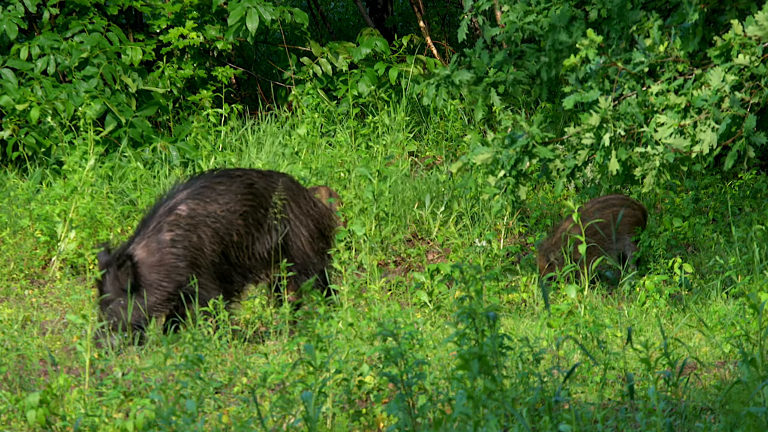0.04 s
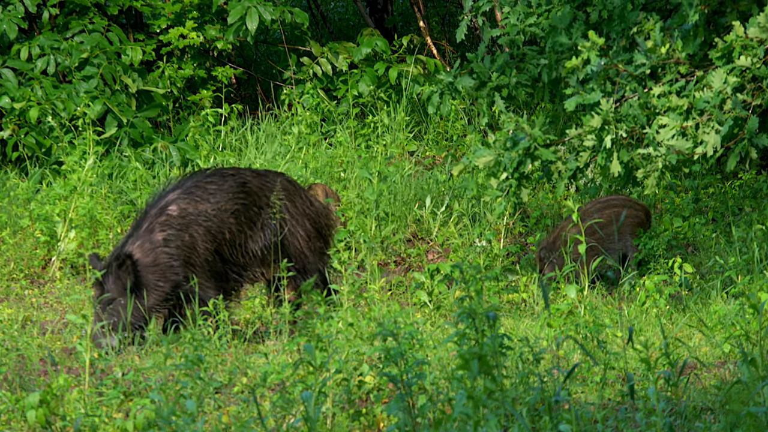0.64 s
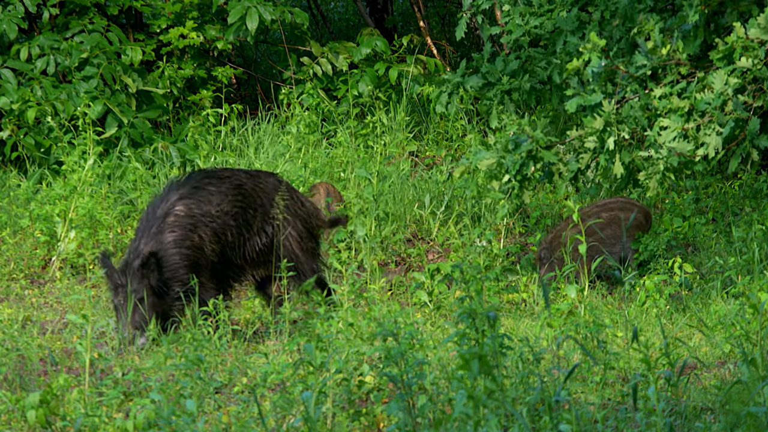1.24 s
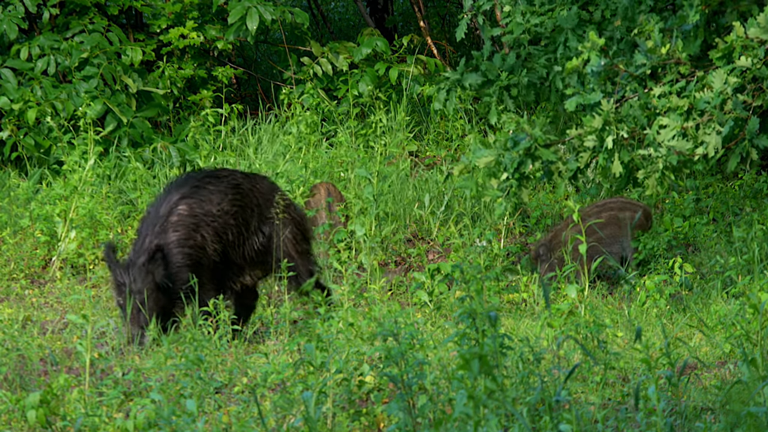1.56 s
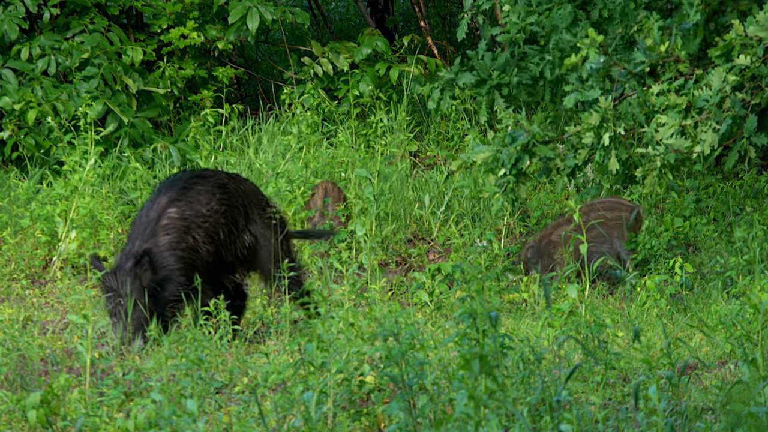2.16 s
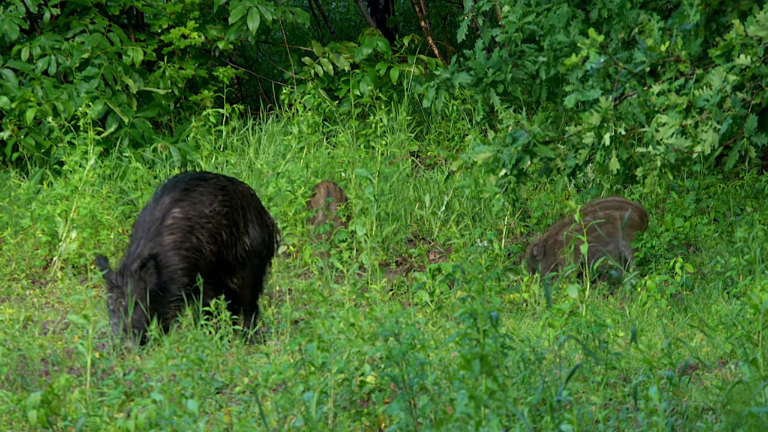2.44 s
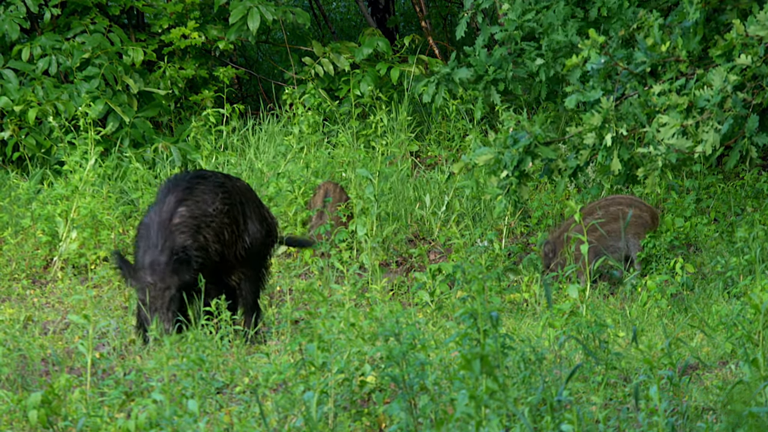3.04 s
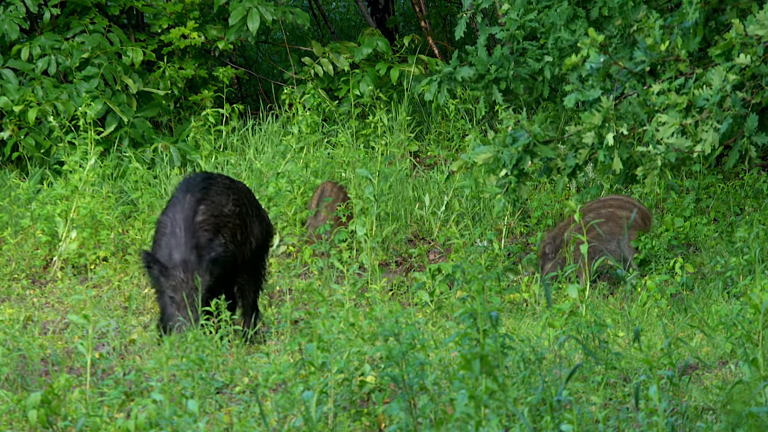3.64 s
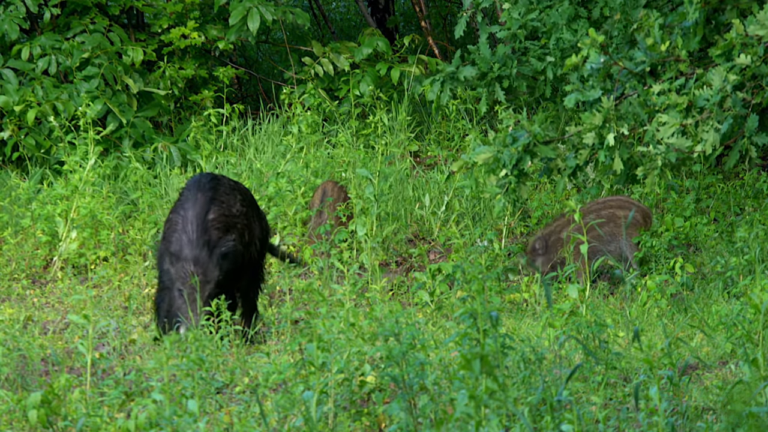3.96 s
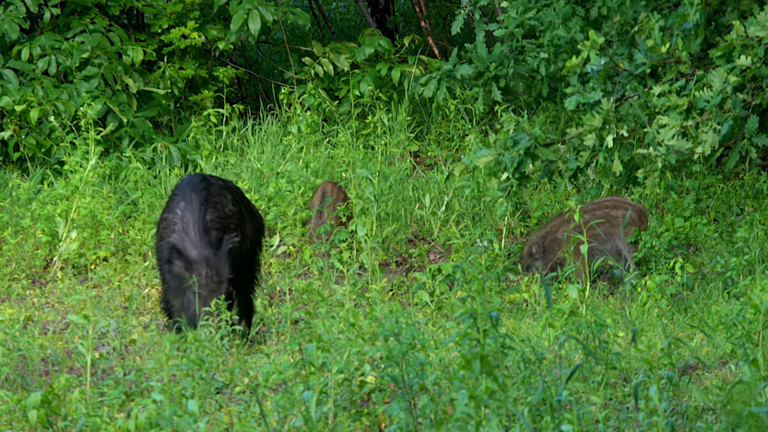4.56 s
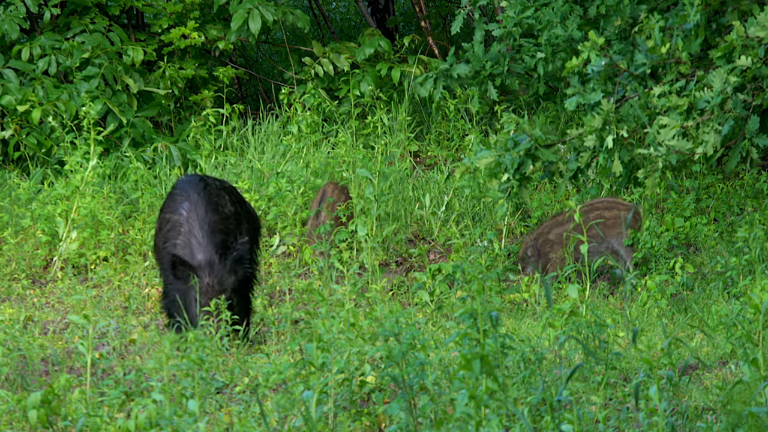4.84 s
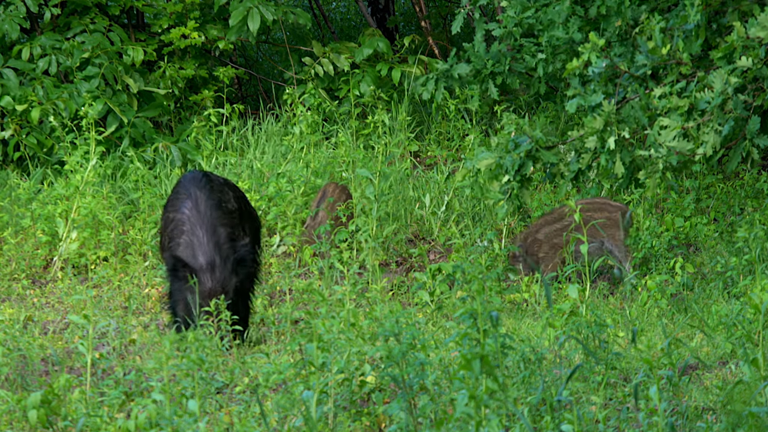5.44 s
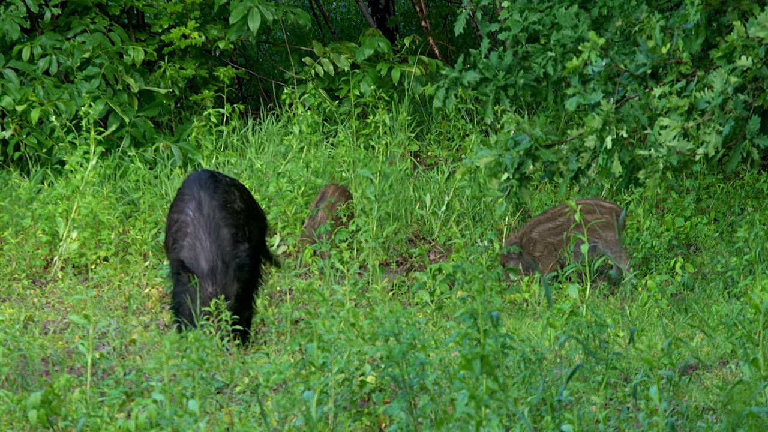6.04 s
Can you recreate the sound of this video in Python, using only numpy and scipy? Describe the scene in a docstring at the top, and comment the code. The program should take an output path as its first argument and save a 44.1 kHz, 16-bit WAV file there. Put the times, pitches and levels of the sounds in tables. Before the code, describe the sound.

Short upward bird whistles recur over distant chirps, soft woodland hiss and occasional crackles of wild boar feeding in plants.

```python
"""A short rising whistle rings through a forest clearing, repeated by one bird and scattered by trees.
A second bird slurs a soft phrase on the left, others call far off, and there is one faint low hoot;
each voice is a nearly pure tone modulated in pitch and level. Grazing wild boar snap stems and brush
plants in bursts of crackling noise, over the steady hush of the wood and its leaves."""
import sys
import numpy as np
from scipy import signal
from scipy.fft import rfft, irfft, next_fast_len
from scipy.io import wavfile
from scipy.ndimage import map_coordinates

SR = 44100
rng = np.random.default_rng(int(sys.argv[2]) if len(sys.argv) > 2 else 0)


def materialize(psi):
    """Save the field psi as 16-bit PCM at rate SR to the path in sys.argv[1].

    A 1-D psi becomes a single channel; in a 2-D psi each row is a channel.
    """
    bounded = np.clip(np.atleast_2d(psi).T, -1, 1)
    quanta = np.round(bounded * 32767).astype(np.int16)
    wavfile.write(sys.argv[1], SR, quanta)


N = 277389

# The main bird's whistles. Each row: loudest moment in seconds, level in dB, time stretch as a ratio.
WHISTLE_CALLS = [(.016, -31.7, 1.05), (1.023, -31, 0.91), (1.945, -32.7, 1.07), (3.057, -31.7, 1.01),
                 (4.267, -32.6, .92), (5.457, -31.2, .87)]
# The whistle's early paths: direct, off the ground and off two trunks.
# Each row: delay in ms, gain in dB, left minus right level in dB, lag of the left channel in ms.
EARLY_PATHS = [(0, 0, -3, .083), (.835, -13, 1, -.04), (2.085, -13, .7, .33), (4.45, -16, -2.5, -.23)]
# The second bird's notes. Each row: start in seconds, length in seconds, centre pitch in Hz,
# opening slide offset in Hz, glide in Hz, closing flick in Hz, level at the centre pitch in dB.
SONG_NOTES = [(0.059, .07, 3250, 600, -600, 0, -56), (0.22, .074, 2930, -2, 333, 1050, -56),
              (.349, .098, 2860, 0, 400, 750, -57), (.512, .168, 3160, 1550, 480, 400, -53.7),
              (.821, 0.05, 3600, -1300, -950, -400, -52), (5.271, 0.018, 4400, 3, 700, 0, -61.5)]
# Far birds. Each row: start in seconds, length in seconds, centre pitch in Hz, glide in Hz, level in dB.
DISTANT_NOTES = [(.06, .16, 2300, -60, -57.5), (.733, .08, 2710, -470, -57), (.785, 0.11, 4290, 90, -54),
                 (1.461, .073, 3220, 183, -54), (1.534, .11, 3860, -100, -55), (1.569, .1, 3000, -950, -54),
                 (2.24, .11, 3360, -2, -58.5), (2.52, .25, 3840, 2, -61.5), (3.192, .076, 3870, -110, -57),
                 (3.223, .1, 2800, -700, -56.5), (3.247, .2, 3380, 200, -60.5),
                 (4.816, .12, 2400, -60, -53), (4.9, .18, 2290, -50, -55.3), (5.235, 0.051, 2540, 40, -53),
                 (5.578, .16, 2130, -37.5, -60.5)]
# Breaking stems. Each row: start in seconds, level in dB, band centre in Hz, 60 dB decay in seconds.
STEM_SNAPS = [(0.1755, -38, 1980, 0.018), (.958, -35.5, 15000, .022), (1.405, -47.5, 3500, 0.027),
              (1.45, -43, 13000, .038), (1.537, -50.5, 13000, .03), (1.615, -52.5, 14000, .035),
              (3.118, -45, 9000, .038), (3.299, -42.5, 12000, .025), (5.377, -55, 12000, .04),
              (5.431, -50.5, 12000, 0.046), (5.567, -44, 11000, .033)]
# Brushed and torn plants. Each row: start in seconds, length in seconds, level in dB, band centre in Hz.
PLANT_RUSTLES = [(0, 0.3, -57.5, 2560), (0, 0.33, -60, 9000), (0.174, 0.039, -47, 2000),
                 (0.944, .13, -59, 8000), (1.41, 0.044, -51.5, 2500), (2.937, 0.033, -56, 1500),
                 (3.449, 0.073, -53.5, 6440), (3.829, 0.059, -52.5, 1700), (4.336, 0.044, -51, 3500),
                 (5.519, 0.23, -56, 2500)]
# The spectrum of the hush. Each row: frequency in Hz, relative spectral density in dB.
HUSH_SPECTRUM = [(15, -55), (25, -30), (37, -17.5), (107, -14.5), (246, -14), (289, -9.5), (410, -8.5),
                 (482, -6.5), (703, -3.5), (782, -1.5), (1490, -2), (1750, -1.5), (3090, -5.5),
                 (3830, -9.5), (15500, -23)]
# The width of the hush. Each row: frequency in Hz, left-right correlation (1 is mono).
HUSH_COHERENCE = [(60, 1.0), (130, 1), (290, 0.89), (640, 0.6), (1410, 0.52), (3100, 0.15), (6820, 0.15),
                  (15000, 0.12)]


def whistler(foliage_db=-3.7, deep_db=-14, absorb_from_hz=3500, absorb_db_per_hz=.0035):
    """Multipath interference: early echoes add and cancel as the pitch climbs, then the wood rings on."""
    out = np.zeros((2, N))
    lead_s = .15  # from onset to loudest moment, before stretching
    for loudest_s, level_db, stretch in WHISTLE_CALLS:
        call = upsweep(lead_s, stretch, level_db)
        start = loudest_s - lead_s * stretch
        for delay_ms, path_db, pan_db, lag_ms in EARLY_PATHS:
            add(out, start, amp(path_db) * placed(call, pan_db, lag_ms, delay_ms))
        # leaves absorb the top of the sweep
        dulled = filtered(call, lambda hz: amp(-absorb_db_per_hz * np.maximum(hz - absorb_from_hz, 0)))
        foliage = amp(foliage_db) * placed(scatter(dulled, t60=.22, onset_s=.005), pan_db=-1.5, lag_ms=0)
        deep_wood = amp(deep_db) * scatter(dulled, t60=.58, onset_s=.045)
        add(out, start, foliage + deep_wood)
    return out


def upsweep(lead_s, stretch, level_db):
    """Frequency modulation: a swelling whistle creeps upward, then leaps just before it is loudest."""
    # times and rates hold for a stretch of 1
    start_hz, creep_hz_per_s = 2725, 5500
    leap_hz, leap_lead_s, leap_s = 640, .0208, .0108
    swell_db_per_s, hold_s, release_db_per_s = 180, .0035, 1800
    soft_onset_db, onset_s, flutter_hz = 8, .032, 35.9
    t = np.arange(-lead_s, 4 * hold_s, 1 / (SR * stretch))  # zero at the loudest moment
    leap = leap_hz / (1 + np.exp(-(t + leap_lead_s) / leap_s))
    hz = start_hz + creep_hz_per_s * (t + lead_s) + leap
    attack_db = swell_db_per_s * np.minimum(t, 0) - soft_onset_db * np.exp(-(t + lead_s) / onset_s)
    release_db = -release_db_per_s * np.maximum(t - hold_s, 0)
    flutter_db = (.3 - 30 * t) * np.cos(2 * np.pi * flutter_hz * t)  # steadies as the whistle swells
    return tone(hz, level_db + attack_db + release_db + flutter_db, waver=.0056)


def singer(slide_s=.02, flick_share=.146, effort_db_per_hz=.0055, wet_db=-7):
    """Coupled pitch and amplitude: the bird on the left grows louder as it bends a note upward."""
    song = np.zeros(N)
    for start, length, centre_hz, slide_hz, glide_hz, flick_hz, db in SONG_NOTES:
        t = np.arange(0, length, 1 / SR)
        progress = t / length
        slide = slide_hz * np.exp(-t / slide_s)
        flick = flick_hz * np.exp((progress - 1) / flick_share)
        bend_hz = slide + glide_hz * (progress - .5) + flick
        add(song, start, tone(centre_hz + bend_hz, db + effort_db_per_hz * bend_hz, waver=.0045, edges=.2))
    return placed(song, pan_db=6, lag_ms=-.06) + amp(wet_db) * scatter(song, t60=.34, onset_s=.0069)


def grazing(fibre_db=4.5, grain_db=5.5, attack_s=.001):
    """Fracture and friction: boar snap stems in decaying bursts and brush plants in grainy swells."""
    out = np.zeros((2, N))
    t = np.arange(SR // 10) / SR
    for start, db, hz, t60 in STEM_SNAPS:
        fibres = amp(fibre_db * wobble(700, len(t)))
        envelope = amp(db - 60 * t / t60) * (1 - np.exp(-t / attack_s))
        add(out, start, envelope * fibres * noise_band(len(t), hz, octaves=.83))
    for start, length, db, hz in PLANT_RUSTLES:
        size = int(length * SR)
        grains = amp(grain_db * wobble(500, SR)[:size])
        add(out, start, amp(db) * np.hanning(size) * unit(grains * noise_band(size, hz, octaves=.89)))
    return out


def far_birds(edge_db=-7):
    """A diffuse field: distant notes swell and fade, arriving only as sound scattered by the trees."""
    song = np.zeros(N)
    for start, length, hz, glide_hz, db in DISTANT_NOTES:
        from_middle = np.linspace(-.5, .5, int(length * SR))
        swell_db = edge_db * 2 * abs(from_middle)
        add(song, start, tone(hz + glide_hz * from_middle, db + swell_db, waver=.013))
    return scatter(song, t60=.35, onset_s=.0013)


def hoot(start_s=.59, hz=194, rise_hz_per_s=28, level_db=-73, fade_db=14):
    """An amplitude envelope: one far, low tone swells, holds and dies away while rising slightly."""
    out = np.zeros(N)
    stages = np.cumsum([0, .045, .12, .2])  # attack, hold and release in seconds
    t = np.arange(0, stages[-1], 1 / SR)
    db = level_db - fade_db * np.interp(t, stages, [1, 0, 0, 1])
    add(out, start_s, tone(hz + rise_hz_per_s * t, db, waver=.0015))
    return out


def hush(wood_db=-56.5, leaf_db=-57, split_hz=3500, stir_db=3, stir_s=.42):
    """Partial coherence: the wood's murmur is near mono in the bass, under a wide hiss of leaves."""
    def mid_side_gains(hz):
        angle = np.arccos(np.clip(along(HUSH_COHERENCE, hz), -1, 1)) / 2
        return amp(along(HUSH_SPECTRUM, hz)) * [np.cos(angle), np.sin(angle)]

    t = np.arange(N) / SR
    mid, side = filtered(rng.standard_normal((2, N)), mid_side_gains)
    air = np.array([mid + side, mid - side])
    low = filtered(air, lambda hz: 1 / (1 + (hz / split_hz) ** 4))
    wood = amp(wood_db) * unit(low)
    leaves = amp(leaf_db + stir_db * np.exp(-t / stir_s)) * unit(air - low)  # louder at first
    return wood + leaves


def scatter(x, t60, onset_s):
    """Reverberation: echoes from leaves and trunks merge into a different tail in each channel."""
    t = np.arange(SR) / SR
    tail = rng.standard_normal((2, SR)) * amp(-60 * t / t60) * (1 - np.exp(-t / onset_s))
    return signal.fftconvolve(x[None], unit(tail) / np.sqrt(SR), axes=1)[:, :N]


def placed(x, pan_db, lag_ms, delay_ms=0):
    """Level and time differences give direction: the left channel is pan_db louder and lag_ms later."""
    side = np.array([[.5], [-.5]])
    arrival_s = (delay_ms + side * lag_ms) / 1000
    return amp(side * pan_db) * filtered(x, lambda hz: np.exp(-2j * np.pi * hz * arrival_s))


def tone(hz, db, waver, edges=.058):
    """A sine whose phase integrates a wavering pitch; edges is the share spent fading in and out."""
    pitch = hz * (1 + waver * wobble(150, SR)[:len(hz)])
    fade = signal.windows.tukey(len(hz), edges)
    return np.sqrt(2) * fade * amp(db) * np.sin(2 * np.pi * np.cumsum(pitch) / SR)


def noise_band(size, centre_hz, octaves):
    """Band-pass filtering: stereo noise falls to half amplitude this many octaves from its centre."""
    white = rng.standard_normal((2, SR))[:, :size]
    return unit(filtered(white, lambda hz: 1 / (1 + (np.log2((hz + 1) / centre_hz) / octaves) ** 2)))


def wobble(rate, size):
    """Spline interpolation: a smooth random curve with rate knots a second."""
    knots = rng.standard_normal(int(size * rate / SR) + 4)
    return map_coordinates(knots, [np.arange(size) * rate / SR])


def filtered(x, response):
    """Linear filtering: the spectrum of x is multiplied by a frequency response."""
    size = x.shape[-1]
    padded = next_fast_len(size + 8192)
    return irfft(rfft(x, padded) * response(np.fft.rfftfreq(padded, 1 / SR)), padded)[..., :size]


def along(points, hz):
    """Interpolation of (Hz, value) points on a logarithmic frequency axis."""
    point_hz, values = np.transpose(points)
    return np.interp(np.log(hz + 1), np.log(point_hz + 1), values)


def amp(db):
    """Decibels as an amplitude ratio."""
    return 10 ** (np.asarray(db) / 20)


def unit(x):
    """Normalisation to an rms of 1."""
    return x / np.sqrt(np.mean(x ** 2) + 1e-20)


def add(track, start_s, sound):
    """Superposition of a sound on a track from start_s onward."""
    start = round(start_s * SR)
    sound = sound[..., max(-start, 0):N - start]
    track[..., max(start, 0):max(start, 0) + sound.shape[-1]] += sound


def scene():
    """Superposition: the birds and the boar add to the hush of the clearing."""
    return whistler() + singer() + far_birds() + hoot() + grazing() + hush()


def record(dry, rumble_hz=33, top_hz=15800):
    """Band limiting: deep rumble is cut and nothing above top_hz passes."""
    return filtered(dry, lambda hz: (hz < top_hz) * (1 - 1 / (1 + (hz / rumble_hz) ** 6)))


dry = scene()
out = record(dry)
materialize(out)
```